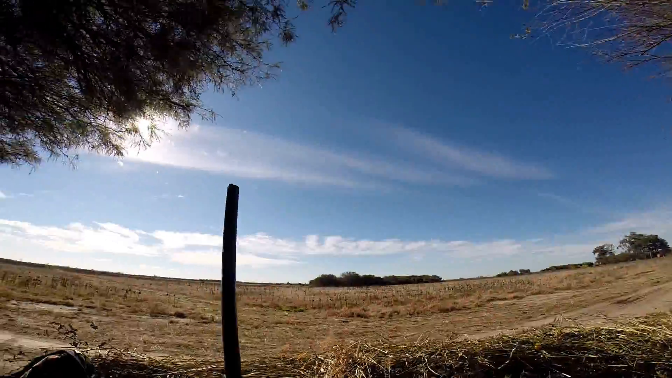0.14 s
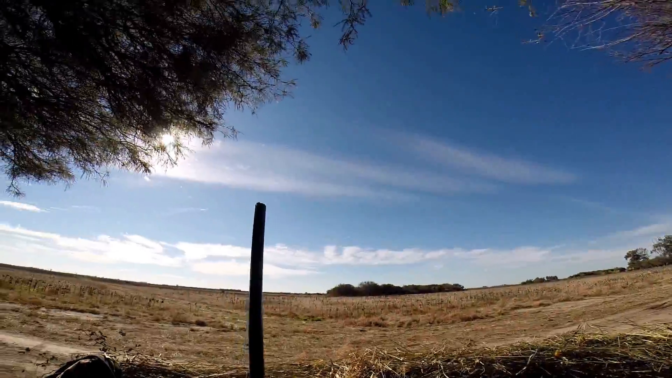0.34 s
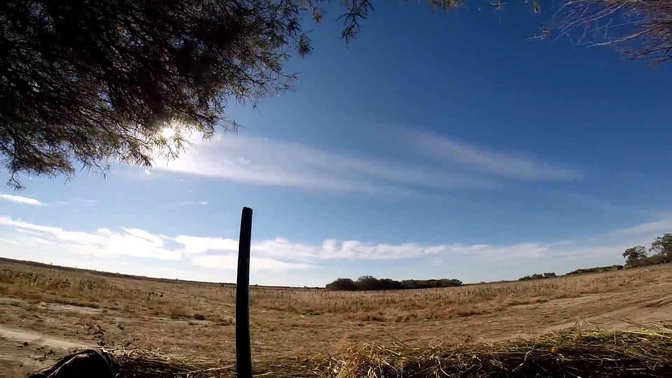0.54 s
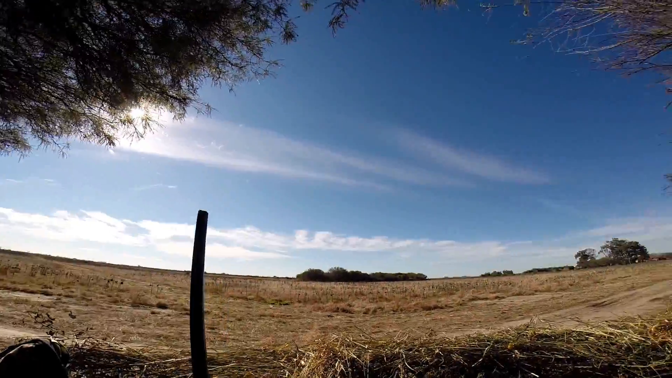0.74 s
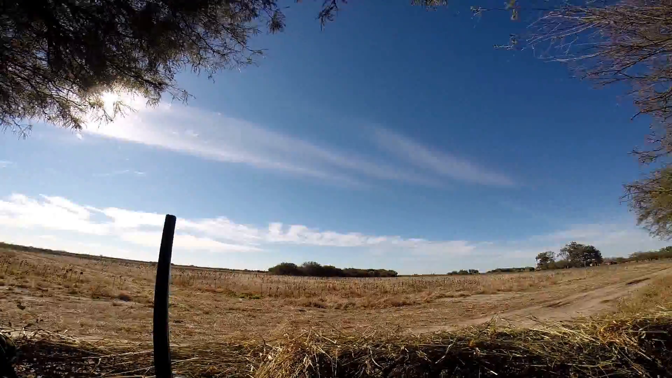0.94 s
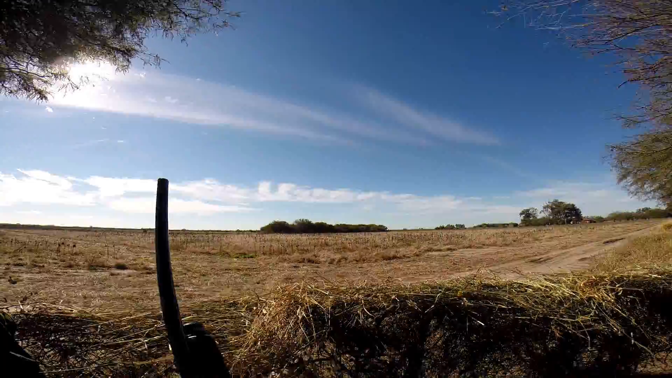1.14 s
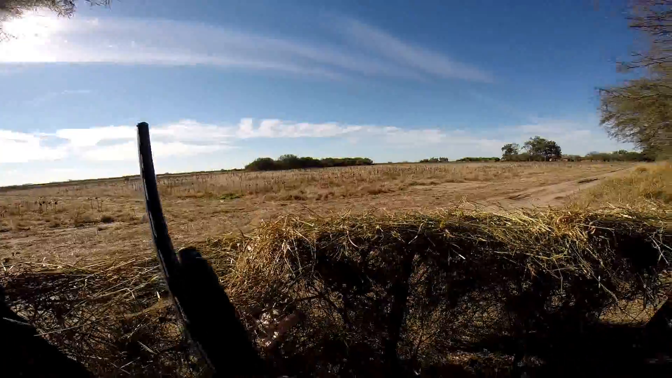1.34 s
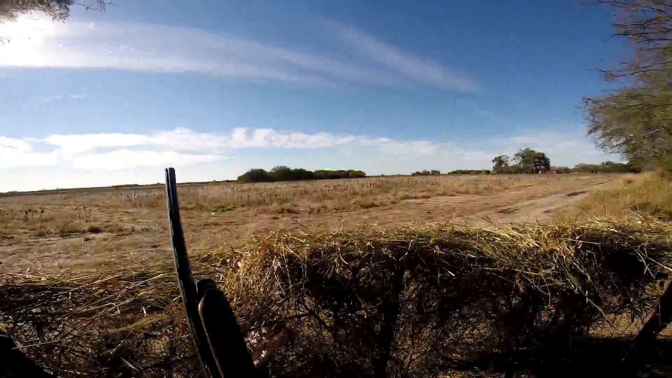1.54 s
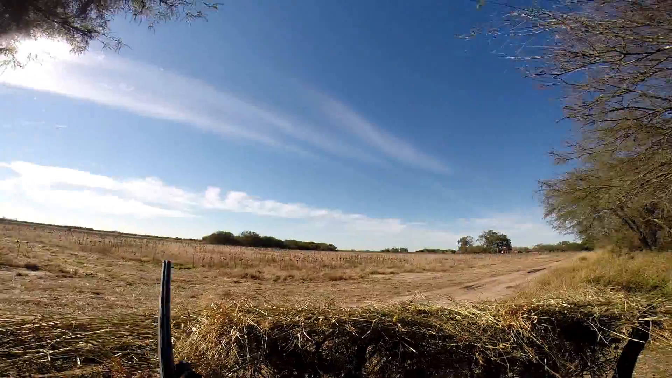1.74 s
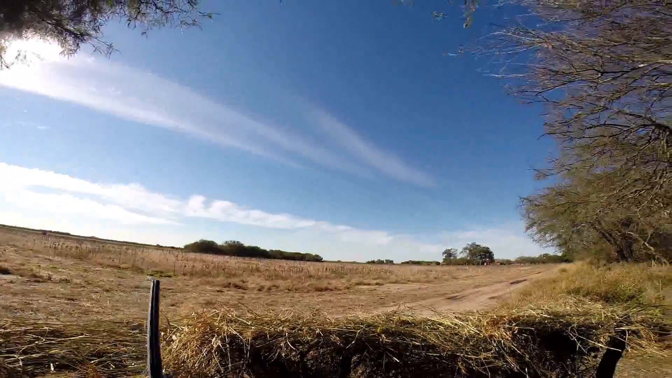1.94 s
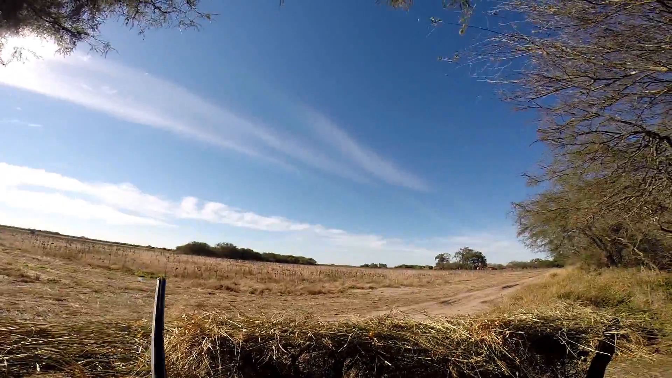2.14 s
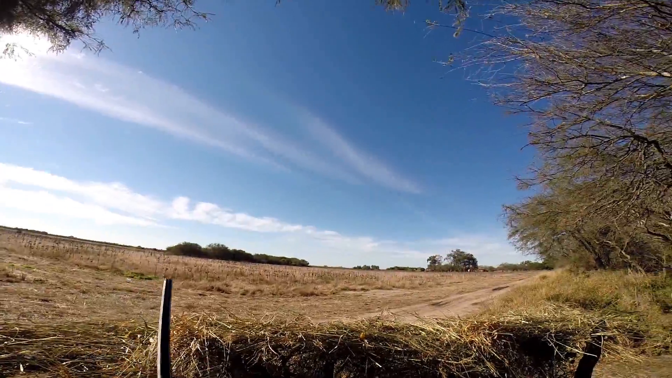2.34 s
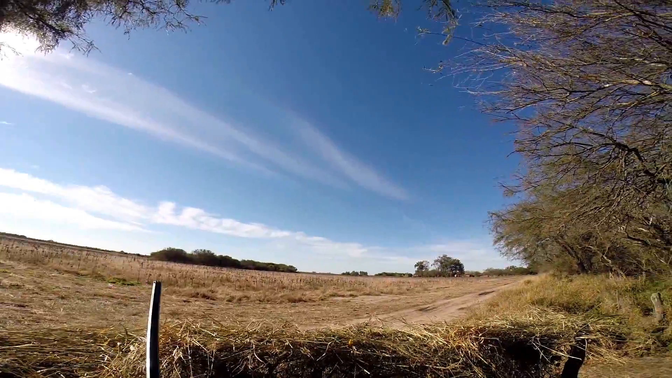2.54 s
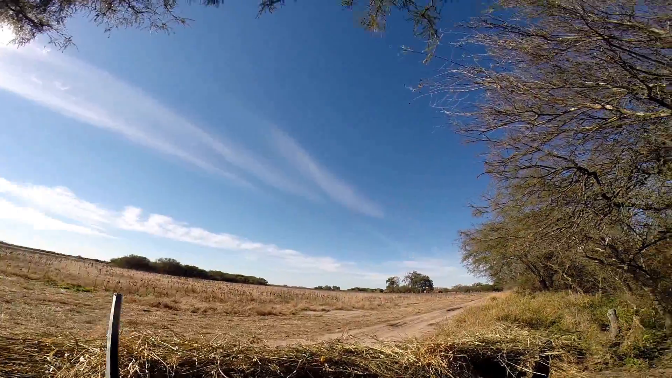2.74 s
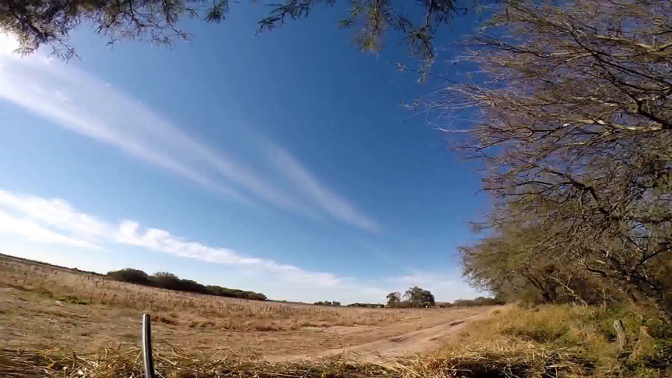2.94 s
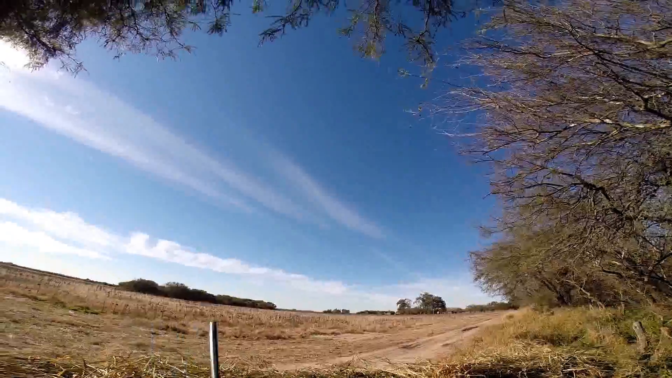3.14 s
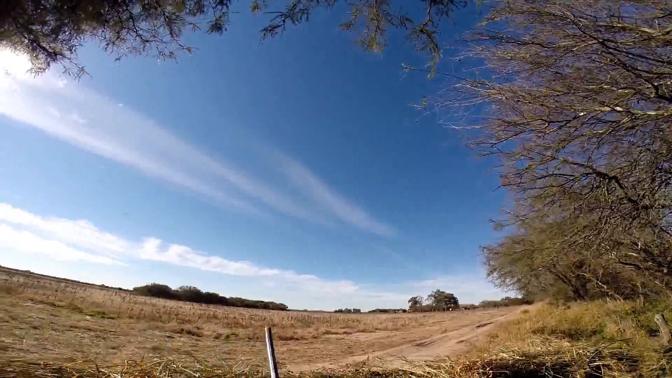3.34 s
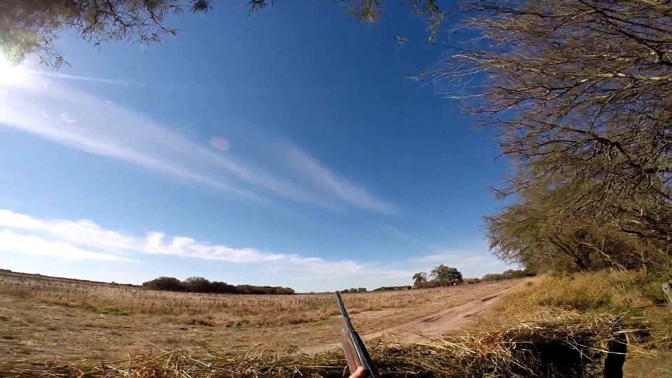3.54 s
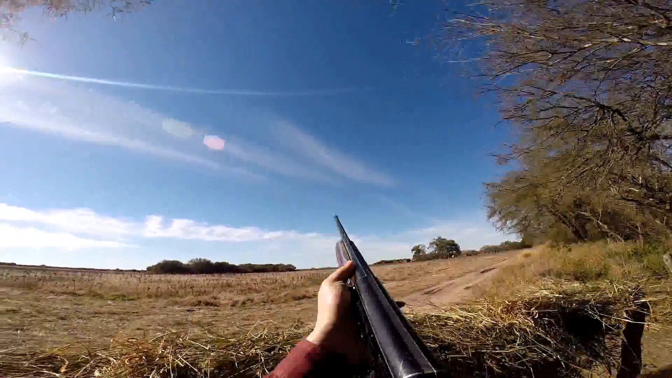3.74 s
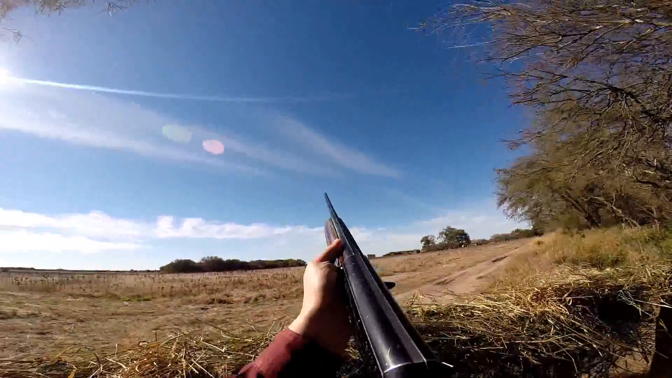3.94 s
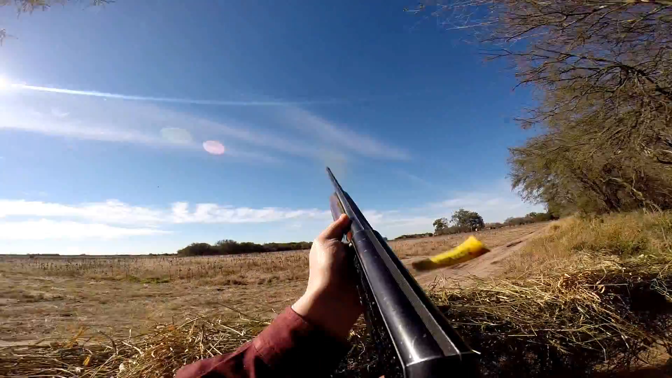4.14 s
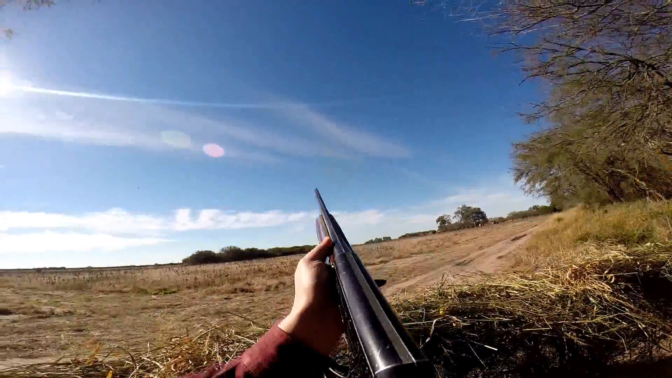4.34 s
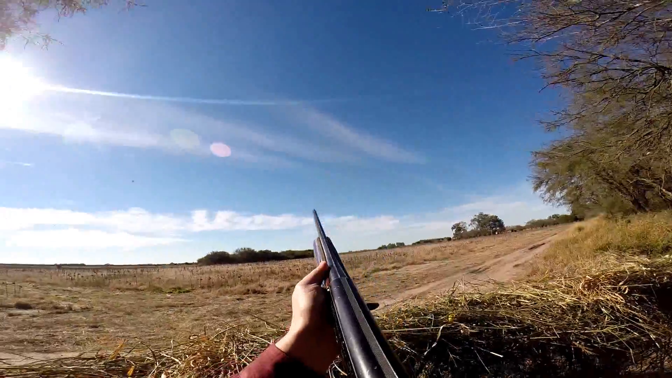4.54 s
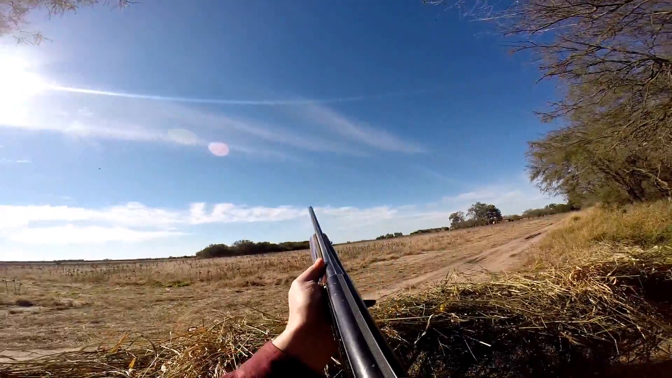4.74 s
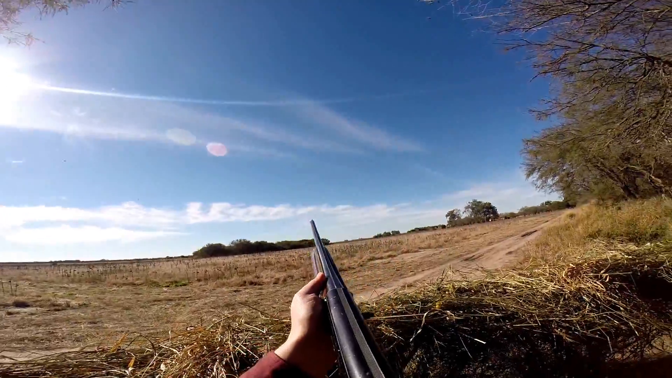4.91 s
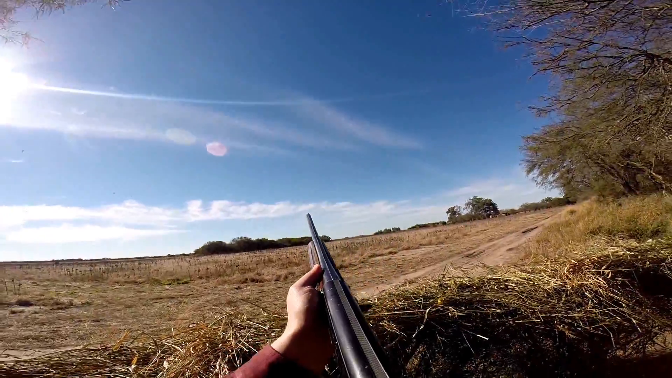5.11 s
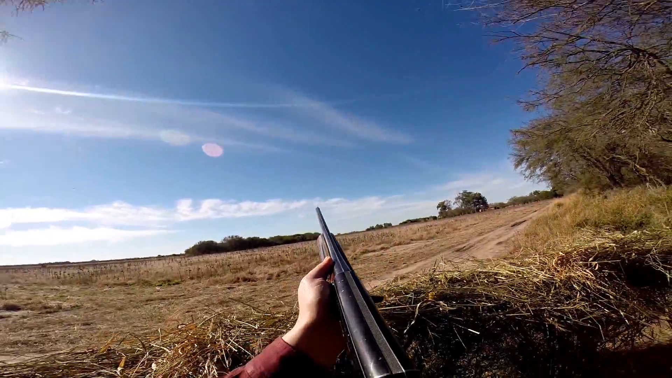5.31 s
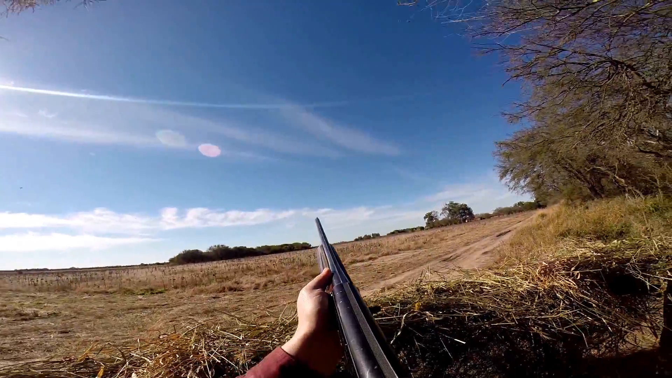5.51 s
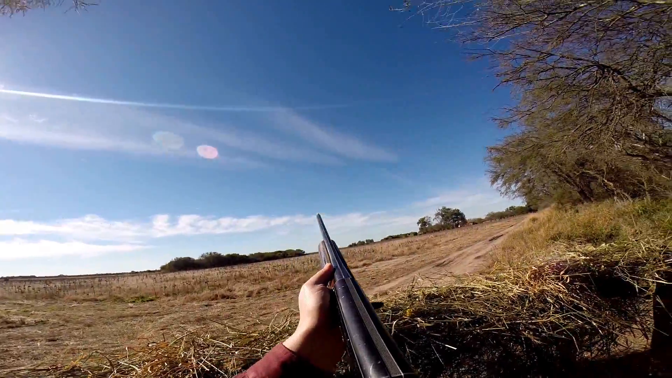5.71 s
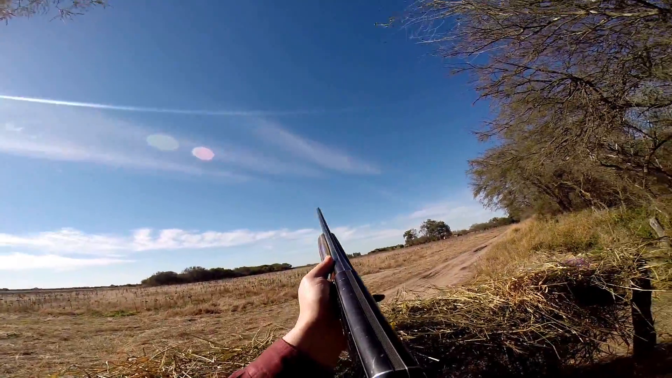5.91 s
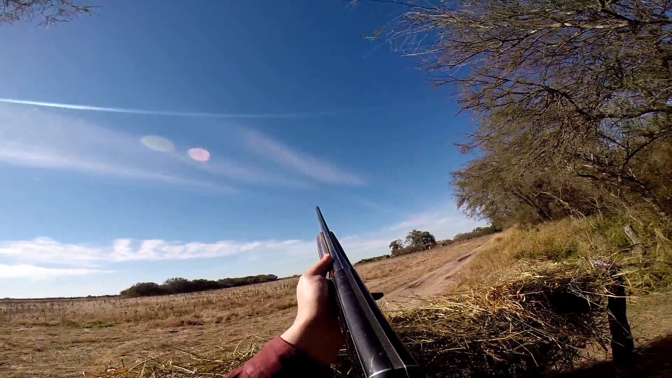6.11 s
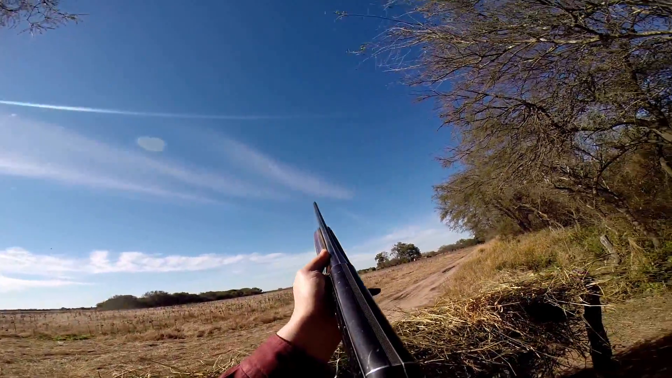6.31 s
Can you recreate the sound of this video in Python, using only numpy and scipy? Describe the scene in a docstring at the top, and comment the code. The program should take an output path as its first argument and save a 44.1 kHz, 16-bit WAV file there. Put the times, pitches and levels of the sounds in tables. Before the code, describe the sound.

In an open field, wind rumbles softly on the microphone over a faint hiss. A distant gun fires once, a thud with a short echo from the trees. Gear and dry stalks tick faintly and sleeves brush straw. Then a shotgun fires at arm's length, very loud and slightly distorted, followed at once by the metallic clack of its action. The background dips briefly and the wind returns.

```python
"""Open field, behind a hay blind; the microphone is in a camera in a plastic housing, worn by a hunter.
Wind rumbles on the housing and sleeves brush the straw. At 1.3 s a gun fires further off and the tree
line throws it back. Gear and dry stalks tick as the hunter turns. At 4.2 s the hunter's own shotgun
fires at arm's length and cycles: the blast rings the housing and overloads the camera, whose gain
control ducks the wind and hiss for a second."""
import sys
import numpy as np
from scipy import signal
from scipy.fft import rfft, irfft
from scipy.io import wavfile
from scipy.ndimage import uniform_filter1d, minimum_filter1d

SR = 44100
rng = np.random.default_rng(int(sys.argv[2]) if len(sys.argv) > 2 else 0)


def dump(signal):
    """Clip the signal to [-1, 1] and save it as 16-bit WAV at the path in sys.argv[1]."""
    limited = np.clip(np.atleast_2d(signal).T, -1, 1)
    pcm = np.round(limited * 32767).astype(np.int16)
    wavfile.write(sys.argv[1], SR, pcm)


N = 280901

# Levels are relative: each source may trim them, and the gain control acts last.
# near gun's ignition, kick, muzzle blast and echo: start_s, level_db, decay_s, turbulent_share, bass_db
NEAR_SHOT = [(4.2245, -3.5, 0.0039, 1, -14), (4.2260, 3.5, 0.00074, 0.45, -14.5),
             (4.229, 10.5, .0016, 0.6, 0.5), (4.247, -10, 0.003, 0.5, -20)]
# its blast at arm's length: frequency_hz, level_db
NEAR_SPECTRUM = [(40, -17), (120, -12.5), (250, -0.5), (480, -4), (770, 1.5), (1000, -3.5), (1220, 1.5),
                 (1550, -8), (2200, -1.5), (2800, 2), (4500, -5), (7000, -10), (11000, -19.5),
                 (13000, -29.5), (15500, -41.5)]
# the action throws the shell and slams shut: start_s, level_db, decay_s
ACTION_CLACKS = [(4.3137, -18, 0.016), (4.3227, -7.5, 0.0044), (4.3279, -17.5, 0.0061),
                 (4.399, -34.5, .003)]
# ring of the action's steel: frequency_hz, level_db
STEEL_SPECTRUM = [(100, -6), (500, -27), (1000, -11), (1500, -16), (2500, 1.5), (2900, 1.5), (3500, 3.5),
                  (4200, 4), (4600, -1.5), (6000, -7.5), (9000, -10.5), (12000, -23), (15500, -23)]
# far gun's first pressure step, then its blast: start_s, level_db, decay_s, turbulent_share, treble_db
FAR_SHOT = [(1.3219, -34, .001, .2, -8), (1.3232, -29, 0.0025, 0.7, 2.5)]
# its blast from across the field: frequency_hz, level_db
FAR_SPECTRUM = [(40, -13), (170, 1.5), (400, -7.5), (540, -3.5), (850, 2), (1250, -14), (1500, 2),
                (1780, 5.5), (2100, -6), (2900, -5.5), (4000, -14), (4700, -19.5), (5200, -21), (5700, -10),
                (6300, -25), (7200, -26), (10000, -40.5), (15500, -54)]
# its echoes off the nearest trees: start_s
TREE_ECHOES = [1.3343, 1.3410, 1.3480, 1.3587]
# sound scattered by stubble and trees: frequency_hz, level_db
SCATTER_SPECTRUM = [(100, -10), (500, -14.5), (1000, -10.5), (1200, -12.5), (1650, -1.5), (2200, -3.5),
                    (2900, -3), (4100, -5), (4750, -1.2), (5300, -6), (6500, -8), (9000, -16),
                    (15000, -28.5)]
# its base decay, which each tail stretches or shortens: frequency_hz, t60_s
SCATTER_T60 = [(200, .45), (1600, .66), (3000, .52), (4500, .47), (9000, .42), (15000, .33)]
# gear and dry stalks close by: start_s, level_db, pitch_hz, treble_db
TICKS = [(1.642, -46, 2400, -2), (1.805, -43.5, 2410, 11), (1.8345, -48, 2540, -5),
         (1.8645, -33.5, 1980, 5.5), (2.2286, -32.5, 3100, -7), (2.2624, -33.5, 3950, -1.5),
         (2.402, -36.5, 3820, 0), (2.415, -52, 3400, -6), (2.4373, -45, 2860, 4), (2.456, -36.5, 3040, 1),
         (2.4705, -49, 3300, -6), (2.6294, -43.5, 2960, -11), (2.6367, -44.5, 2930, -7),
         (5.0324, -47.5, 1412, -7), (5.0415, -52, 2400, 3)]
# colour common to those ticks: frequency_hz, level_db
TICK_SPECTRUM = [(200, -22), (700, 0), (950, -5), (2000, 4), (3700, 5), (5500, -9), (6700, 0), (7700, -9),
                 (10000, -6), (12000, -17), (15000, -31)]
# cloth catches and slips: start_s, level_db, pitch_hz
SCUFFS = [(.074, -53.5, 2290), (.094, -57, 2900), (1.1666, -50.5, 2000), (1.693, -56, 3790),
          (2.3526, -56, 3690), (2.681, -61, 2410), (3.981, -56.5, 1980)]
# sleeves brush the straw: peak_s, level_db, length_s
RUSTLES = [(.18, -64, 0.45), (.5, -65.5, .37), (1.76, -63, 0.54), (2.04, -60, 0.23), (2.39, -67, 0.36),
           (3.78, -62.5, 0.68), (5.2, -62.5, .24)]
# friction of cloth: frequency_hz, level_db
CLOTH_SPECTRUM = [(200, 0), (800, 1), (1500, -2.5), (2300, 2.5), (3000, -1), (4000, -9), (6000, -10.5),
                  (10000, -35), (15000, -35)]
# gusts on the housing: peak_s, level_db, length_s
GUSTS = [(.28, -48.5, 0.52), (1.27, -43.5, 0.19), (1.79, -40.5, .2), (3.47, -37.5, .24), (3.85, -41.5, .8),
         (4.25, -40.5, 0.44), (5.32, -48, .2), (5.9, -51.5, .5)]
# wind rumble at the microphone: frequency_hz, level_db
WIND_SPECTRUM = [(10, -34), (20, 1), (38, -2), (52, -5), (80, -19), (160, -31.5), (400, -62.5)]
# hiss of open air and microphone: frequency_hz, level_db
HISS_SPECTRUM = [(30, -26.5), (90, 0.5), (200, 1), (300, -2), (500, -4.5), (930, -8.5), (1500, -11),
                 (2400, -13), (4000, -17.5), (7500, -24.5), (11000, -28.5), (13500, -27), (15500, -29)]
# whine of the camera's electronics: pitch_hz, level_db
WHINE_TONES = [(5846, -85.5), (8780, -82), (11690, -86), (11719, -82.5), (14626, -90.5)]
# resonances and hollows of the housing around the microphone: centre_hz, width_hz, gain_db
HOUSING_MODES = [(567, 100, -6), (1000, 190, 5), (1235.5, 130, -6), (1534, 170, 7.5), (1890, 140, -3),
                 (2230, 90, 5.5), (2385, 90, 3), (2898, 310, 9.5), (3179, 85, -9), (3620, 150, 4.5),
                 (4273, 150, -9), (4640, 240, 10.5), (5400, 200, 2.5), (6265, 290, 7), (7460, 1100, -4),
                 (8450, 220, 3.5), (10440, 400, 4)]


def near_gun(early_db=-20.5, late_db=-23.5, tail_s=4.231):
    """The blast hits the housing at arm's length, and the field answers."""
    out, hz = np.zeros(N), bins()
    for start_s, db, decay_s, turbulent, bass_db in NEAR_SHOT:
        colour = curve(NEAR_SPECTRUM, hz) + housing_db(hz) + bass_db / (1 + (hz / 1500) ** 4)
        add(out, start_s, amp(db) * burst(colour, decay_s, turbulent, smooth_hz=2340))
    add(out, tail_s, amp(early_db) * scatter(stretch=0.23, grain_db=3, tilt_db=3.5))
    add(out, tail_s, amp(late_db) * scatter(stretch=1, grain_db=1.5, tilt_db=0))
    return out


def gun_action():
    """Steel strikes steel close to the microphone as the gun cycles."""
    out, hz = np.zeros(N), bins()
    colour = curve(STEEL_SPECTRUM, hz) + 0.55 * housing_db(hz)
    for start_s, db, decay_s in ACTION_CLACKS:
        add(out, start_s, amp(db) * burst(colour, decay_s, turbulent=0.93))
    return out


def recoil(start_s=4.255, sway_hz=38, rise_s=0.029, sway_db=-17):
    """The kick shakes the camera: a few slow cycles that swell and die."""
    out, t = np.zeros(N), np.arange(SR // 2) / SR
    envelope = t / rise_s * np.exp(1 - t / rise_s) / (1 + (t / 0.28) ** 12)
    add(out, start_s, amp(sway_db) * envelope * np.sin(2 * np.pi * sway_hz * t))
    return out


def far_gun(tail_s=1.326, echo_db=-33, echo_treble_db=23, fall_db_per_s=212, dulling_db_per_s=560):
    """A dull thud along the ground; brighter echoes follow from the trees, each weaker and duller."""
    out, hz = np.zeros(N), bins()
    colour = curve(FAR_SPECTRUM, hz) + housing_db(hz)
    treble = hz ** 4 / (hz ** 4 + 2000 ** 4)
    for start_s, db, decay_s, turbulent, treble_db in FAR_SHOT:
        add(out, start_s, amp(db) * burst(colour + treble_db * treble, decay_s, turbulent))
    for start_s in TREE_ECHOES:
        lag_s = start_s - TREE_ECHOES[0]
        treble_db = echo_treble_db - dulling_db_per_s * lag_s
        echo = burst(colour + treble_db * treble, decay_s=0.008, turbulent=0.98)
        add(out, start_s, amp(echo_db - fall_db_per_s * lag_s) * echo)
    add(out, tail_s, amp(-48) * scatter(stretch=0.62, grain_db=-3, tilt_db=-2.5))
    add(out, tail_s, amp(-56.5) * scatter(stretch=2, grain_db=0, tilt_db=-2.5))
    return out


def scatter(stretch, grain_db, tilt_db):
    """Stubble and trees return countless small echoes, the top treble dying first."""
    echoes = rng.standard_normal(SR) * grain(grain_db, SR, span=130)
    hz, t, spectra = signal.stft(echoes, SR, nperseg=512)
    colour = curve(SCATTER_SPECTRUM, hz) + 0.7 * housing_db(hz) + tilt_db * np.log2((hz + 100) / 3000)
    fade_db = -60 * t / (stretch * curve(SCATTER_T60, hz)[:, None])
    tail = signal.istft(spectra * amp(colour[:, None] + fade_db), SR)[1][:SR]
    onset = 1 - np.exp(-np.arange(SR) / SR / 0.003)
    return tail / np.std(tail[:SR // 50]) * onset


def ticks(trim_db=-7, ring_db=9, ring_hz=500, body_db=-1, scrape_db=-9):
    """Gear and stalks snap close by, each with its own resonance and a duller scrape trailing it."""
    out, hz = np.zeros(N), bins()
    treble = hz ** 4 / (hz ** 4 + 4400 ** 4)
    body = 1 / (1 + (hz / 1900) ** 4)
    common = curve(TICK_SPECTRUM, hz) + 0.55 * housing_db(hz) + body_db * body
    for start_s, db, pitch_hz, treble_db in TICKS:
        colour = common + ring_db / (1 + ((hz - pitch_hz) / ring_hz) ** 2)
        snap = burst(colour + treble_db * treble, decay_s=0.0016, turbulent=0.88)
        scrape = burst(colour - 6 * treble, decay_s=0.012, turbulent=1)
        add(out, start_s, amp(db + trim_db) * (snap + amp(scrape_db) * scrape))
    return out


def barrel_scrape(peak_s=2.42, length_s=0.19, level_db=-65, pitch_hz=3780, width_hz=170):
    """A stalk slides along the barrel and makes the steel sing faintly."""
    resonance = signal.iirpeak(pitch_hz, pitch_hz / width_hz, fs=SR)
    ring = signal.lfilter(*resonance, rng.standard_normal(N))
    return swells([(peak_s, level_db, length_s)]) * unit(ring)


def scuffs(trim_db=3, ring_db=9, ring_hz=450):
    """Each slip of cloth is a soft, short puff of friction with one broad resonance."""
    out, hz = np.zeros(N), bins()
    for start_s, db, pitch_hz in SCUFFS:
        colour = curve(CLOTH_SPECTRUM, hz) + ring_db / (1 + ((hz - pitch_hz) / ring_hz) ** 2)
        puff = burst(colour, decay_s=0.0099, turbulent=0.86, rise_s=0.00052)
        add(out, start_s, amp(db + trim_db) * puff)
    return out


def rustles(grain_db=3, trim_db=-1):
    """Sleeves brush the straw of the blind in swells of grainy friction noise."""
    friction = grain(grain_db, N, span=160) * noise(CLOTH_SPECTRUM)
    return amp(trim_db) * swells(RUSTLES) * unit(friction)


def wind(breeze_db=-51, gust_trim_db=-1):
    """A steady breeze and its gusts buffet the housing with a low rumble."""
    strength = np.hypot(amp(breeze_db), amp(gust_trim_db) * swells(GUSTS))
    return strength * noise(WIND_SPECTRUM)


def background(hiss_db=-59):
    """Even hiss of open air and microphone, with the thin whine of the camera."""
    t = np.arange(N) / SR
    whine = sum(amp(db) * np.sqrt(2) * np.sin(2 * np.pi * (hz * t + rng.random()))
                for hz, db in WHINE_TONES)
    return amp(hiss_db) * noise(HISS_SPECTRUM) + whine


def housing_db(hz):
    """The colour that the housing gives to sound on its way to the microphone."""
    return sum(db / (1 + (2 * (hz - centre) / width) ** 2) for centre, width, db in HOUSING_MODES)


def burst(colour_db, decay_s, turbulent, size=4096, rise_s=0.00036, smooth_hz=1300):
    """A pressure step and dying turbulence ring a filter; the energy is that of 4 ms at rms 1."""
    t, hz = np.arange(size) / SR, bins()
    envelope = np.exp(-t / decay_s) * (1 - np.exp(-t / rise_s))
    swirl = rfft(rng.standard_normal(size) * envelope)
    swirl /= np.sqrt(np.mean(abs(swirl) ** 2))
    share = turbulent ** (1 + (smooth_hz / (hz + 100)) ** 2)  # long waves stay one clean pulse
    step = causal(colour_db + 10 * np.log10(1 - share + 1e-4))
    roar = causal(colour_db + 10 * np.log10(share + 1e-4)) * swirl
    fade = np.minimum(np.linspace(4, 0, size), 1)
    return unit(irfft(step + roar) * fade) * np.sqrt(0.004 * SR / size)


def causal(db):
    """The response of a filter with this colour that rings only after it is struck."""
    log_gain = np.log(amp(np.r_[db, db[-2:0:-1]]))
    return np.exp(np.conj(signal.hilbert(log_gain)))[:len(db)]


def swells(rows):
    """A smooth rise and fall in level for each row, starting no earlier than time zero."""
    out = np.zeros(N)
    for peak_s, db, length_s in rows:
        add(out, max(peak_s - length_s / 2, 0), amp(db) * np.hanning(round(length_s * SR)))
    return out


def grain(depth_db, size, span):
    """A gain that flickers at random, smoothed over span samples."""
    return amp(depth_db * unit(uniform_filter1d(rng.standard_normal(size), size=span)))


def noise(spectrum):
    """Steady noise with the given spectrum."""
    return unit(irfft(rfft(rng.standard_normal(N)) * amp(curve(spectrum, bins(N))), N))


def curve(points, hz):
    """Joins the points on a log-frequency axis."""
    points_hz, values = np.transpose(points)
    return np.interp(np.log(hz + 1), np.log(points_hz + 1), values)


def bins(size=4096):
    """Frequencies in the spectrum of size samples."""
    return np.fft.rfftfreq(size, 1 / SR)


def add(mix, start_s, sound):
    """Mixes a sound in at start_s."""
    part = mix[round(start_s * SR):][:len(sound)]
    part += sound[:len(part)]


def amp(db):
    """Decibels to gain."""
    return 10 ** (np.asarray(db) / 20)


def unit(x):
    """Scales to rms 1."""
    return x / np.sqrt(np.mean(x ** 2) + 1e-20)


def scene():
    """Everything at the one microphone: the guns, the hunter's movements and the open air."""
    guns = near_gun() + gun_action() + recoil() + far_gun()
    movement = ticks() + barrel_scrape() + scuffs() + rustles()
    return (guns + movement + wind() + background())[None]


def record(dry, threshold_db=-6, depth_db=13, hold_s=0.33, ahead_s=0.012, recovery_db_per_s=18,
           soft_hz=12000, edge_hz=15500):
    """Gain control looks ahead, ducks, holds and recovers; the blast still clips; the top rolls off."""
    mic, t = dry[0], np.arange(N) / SR
    over_db = np.clip(20 * np.log10(abs(mic) + 1e-9) - threshold_db, 0, depth_db)
    span = round(hold_s * SR)
    held_db = np.roll(-minimum_filter1d(-over_db, span), span // 2 - round(ahead_s * SR))
    recovery_db = recovery_db_per_s * t
    duck_db = np.maximum.accumulate(held_db + recovery_db) - recovery_db
    ducked = mic * amp(-uniform_filter1d(duck_db, size=100))
    clipped = ducked / (1 + ducked ** 6) ** (1 / 6)
    softened = signal.lfilter(*signal.butter(2, soft_hz, fs=SR), clipped)
    steep_lowpass = signal.firwin(401, edge_hz, window=("kaiser", 9), fs=SR)
    return signal.oaconvolve(softened, steep_lowpass, "same")[None]


dry = scene()
out = record(dry)
dump(out)
```